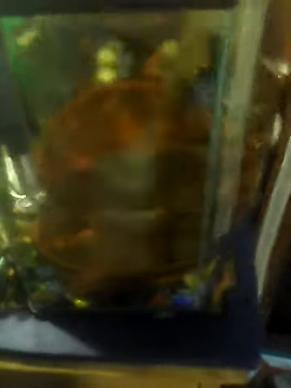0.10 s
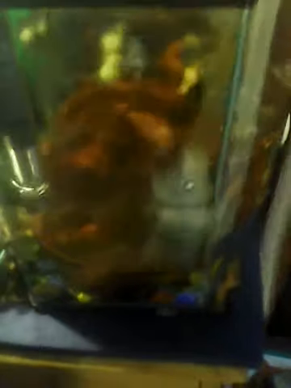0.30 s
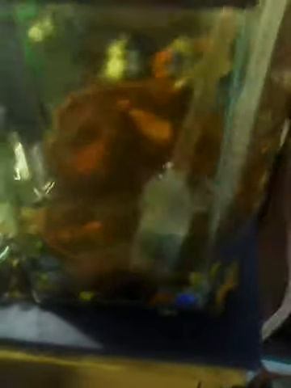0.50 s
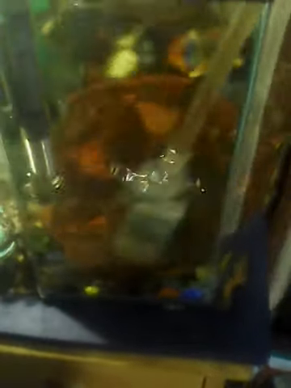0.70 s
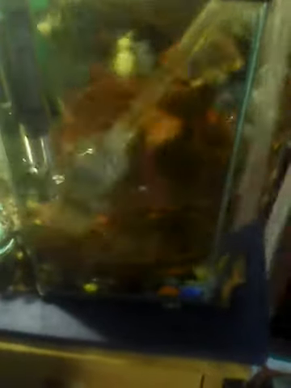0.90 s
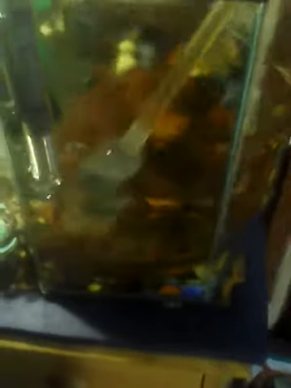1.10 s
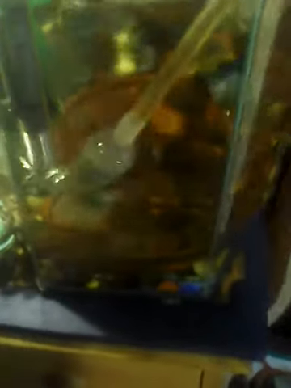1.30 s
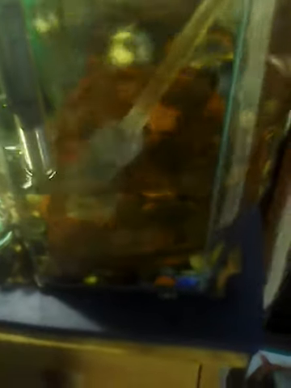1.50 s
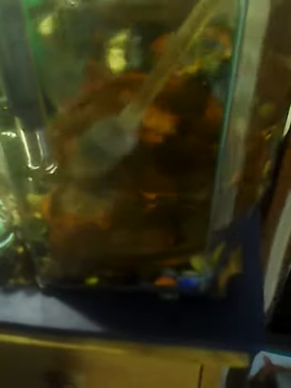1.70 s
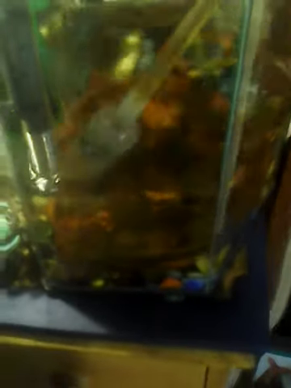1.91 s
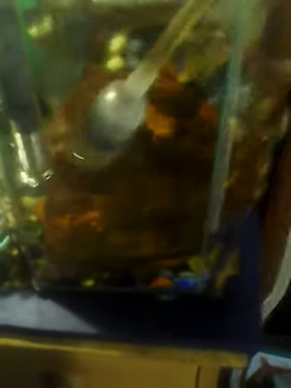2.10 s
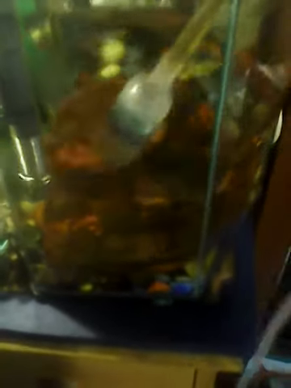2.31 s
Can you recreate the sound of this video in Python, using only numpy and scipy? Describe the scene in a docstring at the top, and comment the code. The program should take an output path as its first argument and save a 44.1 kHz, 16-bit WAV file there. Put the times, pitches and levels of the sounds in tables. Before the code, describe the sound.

A plastic siphon tube knocks and taps irregularly against aquarium glass, each hit ringing briefly with a low boom. The knocks thin out, leaving soft water wobbles and faint bubbles, heard nearby in a small room.

```python
"""Knocks and taps on glass, as a plastic siphon tube is moved about in an aquarium.
Each knock rings the glass and the tube and makes the water-loaded walls boom briefly.
Soft bumps pass through the water, which wobbles and lets off small bubbles.
Behind it all are a low rumble from the stand, a small room's echo and a faint steady hiss."""
import sys
import numpy as np
from scipy import signal
from scipy.fft import rfft, irfft, next_fast_len
from scipy.io import wavfile
from scipy.ndimage import uniform_filter1d

SR = 44100
rng = np.random.default_rng(int(sys.argv[2]) if len(sys.argv) > 2 else 0)


def wav_out(sig):
    """Save sig, one row per channel (or a flat mono array), as 16-bit PCM at SR to the path in sys.argv[1]."""
    wavfile.write(sys.argv[1], SR, np.round(np.clip(np.atleast_2d(sig).T, -1, 1) * 32767).astype(np.int16))


N = 105840


def tube_knocks():
    """The tube hits the glass: a sharp crack, ringing panes and tube, and a boom from the walls."""
    # each hit: start_s, boom_db, clunk_db, clack_db, tick_db, tube_db
    hits = [(0.177, -50, -28.5, -34.5, -50, -66), (.1960, -24, -8.5, -18, -34, -60),
            (.213, -33.5, -34, -40, -39, -65), (0.345, -30, -24, -27, -35.5, -36),
            (.368, -39.5, -23, -31.5, -41, -70), (0.4377, -27, -22.5, -27.5, -47.5, -75),
            (.469, -49, -19.5, -25, -41, -67), (0.487, -36, -24.5, -26.5, -43.5, -39),
            (0.509, -29, -21, -21.5, -43.5, -40.5), (0.5498, -30, -9.5, -7.5, -7, -5.5),
            (0.614, -31, -22.5, -20, -18, -42), (.871, -37.5, -38.5, -39, -49, -58),
            (.9370, -19.5, -6, -7, -22, -32), (.985, -34, -44, -40, -58, -72),
            (1.0962, -37, -22.5, -26.5, -30, -32.5), (1.145, -57, -38.5, -38.5, -47, -50),
            (1.28, -43, -29.5, -40.5, -61, -61), (1.325, -45, -35.5, -36, -53.5, -67.5),
            (1.5376, -30, -23, -39, -50.5, -62.5), (1.5667, -34, -25, -32, -77, -67.5),
            (1.6116, -53.5, -42, -34.5, -42.5, -44.5), (2.2704, -34, -18, -36.5, -45, -49.5)]
    # ringing tones of the glass panes: pitch_hz, level_db, fade_s
    glass_tones = [(639, -13, 0.084), (733, -23.5, 0.16), (853, -21.5, .1), (935.4, -16, 0.068),
                   (1026, -18, 0.081), (1115, -25.5, 0.17), (1368, -18, 0.093), (1412, -17, 0.09),
                   (1603, -21.5, 0.085), (1873, -12, 0.05), (1974, -10, 0.046)]
    # low tones of the water-loaded walls: pitch_hz, level_db, fade_s
    wall_tones = [(226, -4, 0.11), (295.2, 10.5, 0.046), (349.3, -11.5, 0.13)]
    # bright tones of the stiff tube: pitch_hz, level_db, fade_s
    tube_tones = [(2047, -14, .11), (2250, -12, .12), (2470, -18, .07), (2605, -15, .09), (2648, -13, .1),
                  (2760, -5, .028), (3050, -8, .035), (3222, -15, .08), (3451, -17, .07), (3790, -14, .08),
                  (5005, -21, .07), (5967, -19, .08), (6153, -13, .035)]
    # tone colour of a hit on glass: pitch_hz, level_db
    hit_colour = [(60, -24), (200, -8), (480, 2.5), (700, 1), (1300, -0.5), (1700, -1.5), (2100, 2.5),
                  (2800, -1), (3800, 6), (4300, -2), (4900, 4.5), (5500, -2), (6200, 1.5), (7200, -11.5),
                  (8200, -22.5), (9200, -24.5), (11500, -32), (15000, -36)]
    clunk_hz, clack_hz, tick_hz = 800, 1940, 4400
    crack_rise_s, wall_rise_s, soft_rise_s = .0006, .0049, .0017
    crack_decay_s, rattle_decay_s = .0042, .023
    rattle_db, glass_db, soft_below_db = -16, -4.5, -39
    out, t = np.zeros(N), np.arange(SR // 5) / SR
    boom = ring(t, wall_tones) * fade_in(t, wall_rise_s)
    dying = np.exp(-t / crack_decay_s) + gain(rattle_db) * np.exp(-t / rattle_decay_s)
    onset = fade_in(t, crack_rise_s)
    click = gain(6) * signal.unit_impulse(len(t), int(.0012 * SR))  # the moment of full contact
    tube = onset * ring(t, tube_tones)
    for start_s, boom_db, clunk_db, clack_db, tick_db, tube_db in hits:
        crack = dying * rng.standard_normal(len(t))
        glass = gain(glass_db) * ring(t, glass_tones)  # each hit lands elsewhere, favouring other tones
        hit = colour(click + onset * (crack + glass), hit_colour)
        hit = colour(hit, [(clunk_hz, clunk_db), (clack_hz, clack_db), (tick_hz, tick_db)])
        if tick_db < soft_below_db:  # a gentle touch rubs on gradually
            hit = hit * (1 - np.exp(-t / soft_rise_s))
        add(out, start_s, hit + gain(boom_db) * boom + gain(tube_db) * tube)
    return out


def water_bumps():
    """Soft pushes through the water swell and die in a few cycles, sagging in pitch."""
    # each bump: start_s, pitch_hz, level_db, rise_s
    bumps = [(0.159, 315, -34.5, 0.0039), (0.1984, 247, -24, 0.0074), (.212, 262, -22, 0.0068),
             (0.3644, 330, -16.5, 0.0061), (0.396, 273.4, -30, 0.0065), (0.46, 250, -23, .005),
             (.471, 267.7, -12.5, 0.0059), (0.485, 137.3, -38, 0.0097), (0.551, 255.5, -31, 0.018),
             (.566, 332.4, -23.5, .009), (.574, 238, -22, 0.012), (0.741, 302, -41.5, 0.0079),
             (0.928, 294, -32.5, 0.01), (.9415, 269, -13, 0.0073), (1.040, 336, -51, 0.008),
             (1.072, 358, -34, 0.009), (1.207, 310, -44, 0.0071), (1.428, 269, -49, 0.0097),
             (1.5357, 348, -31, 0.0034), (1.556, 283.6, -33, 0.009)]
    sag_per_s = 2.4
    out, t = np.zeros(N), np.arange(SR // 6) / SR
    for start_s, pitch_hz, level_db, rise_s in bumps:
        swell = (t / rise_s * np.exp(1 - t / rise_s)) ** 2
        tone = np.sin(2 * np.pi * pitch_hz * t * (1 - sag_per_s * t / 2))
        add(out, start_s, gain(level_db) * swell * tone)
    return out


def water_slosh():
    """Stirred water wobbles against the walls: low noise with a flickering level."""
    # how strongly the water is stirred: time_s, level_db
    stirring = [(0, -77.5), (.13, -86), (.3, -55.5), (.65, -74), (.85, -53.5), (1.1, -45), (1.35, -69),
                (1.5, -67.5), (1.68, -63), (1.95, -71.5), (2.4, -84)]
    # tone colour of the moving water: pitch_hz, level_db
    water_colour = [(40, -18), (65, -10.5), (150, -19.5), (220, -7.5), (300, 2.5), (400, -2), (520, -16),
                    (1000, -25), (2500, -22), (6000, -37), (9000, -99.5)]
    stir_db = np.interp(np.arange(N) / SR, *np.array(stirring).T)
    water = set_level(colour(rng.standard_normal(N), water_colour), 0)
    flicker_db = 4 * wander(rate_hz=34.71)
    return water * gain(stir_db + flicker_db)


def bubble(hz):
    """One bubble opens with a splashy pop and a short ring that rises in pitch."""
    onset_cycles, ring_cycles, pop_cycles, rise_per_s = 4.8, 14, 15, 2.5
    t = np.arange(SR // 16) / SR
    cycles = t * hz
    tone = np.exp(-cycles / ring_cycles) * np.sin(2 * np.pi * cycles * (1 + rise_per_s * t / 2))
    pop_colour = [(hz / 4, -30), (hz / 2, -20), (hz, 0), (hz * 1.59, -26), (hz * 1.55, -60)]
    pop = set_level(colour(rng.standard_normal(len(t)), pop_colour), -3)
    return fade_in(cycles, onset_cycles) * (tone + pop * np.exp(-cycles / pop_cycles))


def bubbles():
    """The water lets off a few clear bubbles among a fizz of tiny ones."""
    # each clear bubble: start_s, pitch_hz, level_db
    clear_bubbles = [(0.782, 5860, -49.5), (0.9, 2310, -48), (0.909, 5200, -50), (1.2536, 2150, -45.5),
                     (1.436, 3120, -52.5), (1.51, 1320, -55), (1.621, 1457, -47.5), (1.639, 3146, -47.5),
                     (1.652, 7040, -50), (1.7655, 1566, -50.5), (1.84, 2310, -46.5), (1.9166, 5500, -52.5),
                     (1.9726, 1646, -45), (1.945, 1980, -53), (2.0108, 1570, -49), (2.029, 1710, -55),
                     (2.013, 5140, -42.5), (2.0799, 1150, -50.5), (2.1499, 5960, -42), (2.359, 1807, -46.5),
                     (2.3836, 2140, -44)]
    fizz_per_s, fizz_db, spread_db = 110, -62, 2.5
    low_hz, high_hz = 900, 7000
    out = np.zeros(N)
    for start_s, pitch_hz, level_db in clear_bubbles:
        add(out, start_s, gain(level_db) * bubble(pitch_hz))
    for when, pitch, size in rng.random((int(fizz_per_s * N / SR), 3)):
        level_db = fizz_db + spread_db * (2 * size - 2.5)
        pitch_hz = low_hz * (high_hz / low_hz) ** pitch
        add(out, when * N / SR, gain(level_db) * bubble(pitch_hz))
    return colour(out, [(6500, 0), (8500, -16)])  # soften the treble


def spray():
    """The tiniest bubbles burst as faint high ticks."""
    ticks_per_s, pitch_hz, decay_s = 22, 11000, .003
    out, t = np.zeros(N), np.arange(SR // 40) / SR
    for when, size in rng.random((int(ticks_per_s * N / SR), 2)):
        tick = colour(rng.standard_normal(len(t)), [(pitch_hz / 2, -15), (pitch_hz, 0), (pitch_hz * 2, -8)])
        add(out, when * N / SR, gain(-76) * 2 * size * tick * np.exp(-t / decay_s))
    return out


def stand_rumble(blows):
    """The bass of each blow lingers as a rumble in the aquarium's stand."""
    bass = colour(blows, [(35, -16), (65, 27.5), (120, 13.5), (220, -1.5), (500, -31), (1500, -42.5)])
    return gain(-18.5) * linger(bass, fade_s=.72, rise_s=.019)


def room_echo(sound):
    """The small room gives a short echo and swallows the highest treble."""
    return colour(linger(sound, fade_s=.19, rise_s=.0087), [(6500, -.5), (10000, -8)])


def steady_hiss():
    """Faint, even noise in the background."""
    # tone colour of the hiss: pitch_hz, level_db
    hiss_colour = [(25, 2), (60, -4.5), (130, -0.5), (200, -5.5), (290, -1.5), (500, -10.5), (850, -11),
                   (1800, -19), (2500, -17.5), (3400, -14), (4200, -20), (5100, -16), (6200, -18.5),
                   (7100, -22), (8300, -39), (12700, -40.5), (15800, -40.5)]
    return set_level(colour(rng.standard_normal(N), hiss_colour), -61)


def gain(db):
    """Turn decibels into a multiplier."""
    return 10 ** (np.asarray(db) / 20)


def set_level(x, db):
    """Set a sound's average (rms) level."""
    return x * gain(db) / np.sqrt(np.mean(x ** 2))


def add(out, start_s, x):
    """Mix a sound in at a given time."""
    i = max(int(start_s * SR), 0)
    part = out[i:i + len(x)]
    part += x[:len(part)]


def colour(x, points):
    """Turn lows and highs up or down along a curve of (pitch_hz, level_db) points."""
    size = next_fast_len(2 * len(x), real=True) // 2 * 2
    hz, db = np.array(points, float).T
    grid_hz = np.maximum(np.arange(size // 2 + 1) * SR / size, 1)
    curve_db = np.interp(np.log(grid_hz), np.log(hz), db)
    cepstrum = irfft(np.log(gain(curve_db)))
    cepstrum[1:size // 2] *= 2  # fold it so that nothing rings before the sound starts
    cepstrum[size // 2 + 1:] = 0
    return irfft(rfft(x, size) * np.exp(rfft(cepstrum)))[:len(x)]


def wander(rate_hz):
    """A smooth random drift, about 1 in size."""
    hold = int(SR / rate_hz)
    steps = np.repeat(rng.standard_normal(N // hold + 1), hold)
    drift = uniform_filter1d(uniform_filter1d(steps, hold), hold)[:N]
    return drift / drift.std()


def fade_in(t, rise):
    """Rise smoothly from 0 to 1."""
    return 1 - np.exp(-(t / rise) ** 2)


def fade_out(t, fade_s):
    """Fall by 60 dB in fade_s seconds."""
    return np.exp(-np.log(1000) * t / fade_s)


def ring(t, tones, spread_db=2):
    """A struck object rings with fading tones, each a little louder or softer by chance."""
    offsets_db = spread_db * rng.standard_normal(len(tones))
    return sum(gain(db + offset) * fade_out(t, fade_s) * np.sin(2 * np.pi * hz * t)
               for (hz, db, fade_s), offset in zip(tones, offsets_db))


def linger(x, fade_s, rise_s):
    """Smear a sound into a fading tail of many tiny echoes."""
    t = np.arange(SR // 2) / SR
    tail = rng.standard_normal(len(t)) * fade_out(t, fade_s) * fade_in(t, rise_s)
    return signal.fftconvolve(x, tail / np.linalg.norm(tail))[:N]


def scene():
    """Tank, water and room at one microphone."""
    knocks, bumps = tube_knocks(), water_bumps()
    hiss = steady_hiss()
    slosh = water_slosh()
    rumble = stand_rumble(knocks + bumps)
    bubbling = bubbles()
    echo = room_echo(gain(-10) * knocks + gain(-12) * bumps + gain(-6.5) * bubbling)
    return (knocks + bumps + bubbling + slosh + rumble + echo + hiss + spray())[None]


def record(dry):
    """The microphone loses the deepest bass; the recorder cuts the highest treble."""
    low_hz, top_hz = 50, 15600
    thin = signal.sosfilt(signal.butter(3, low_hz, "high", fs=SR, output="sos"), dry)
    return signal.sosfilt(signal.ellip(8, .2, 70, top_hz, fs=SR, output="sos"), thin)


dry = scene()
out = record(dry)
wav_out(out)
```